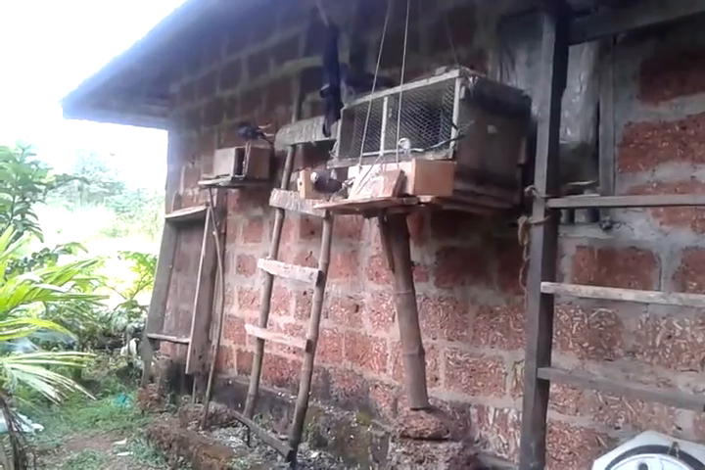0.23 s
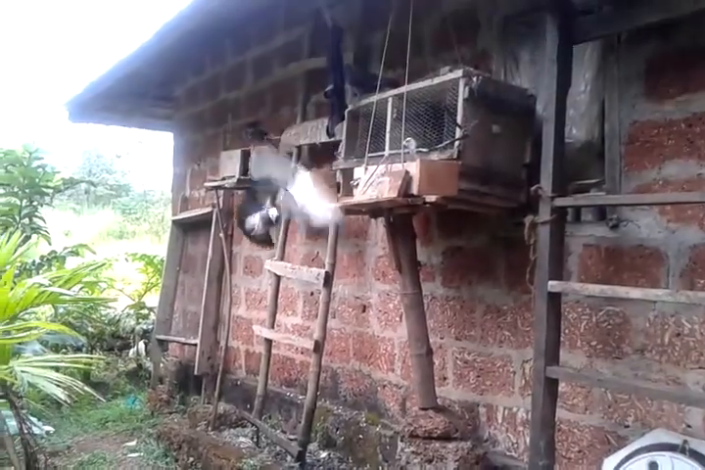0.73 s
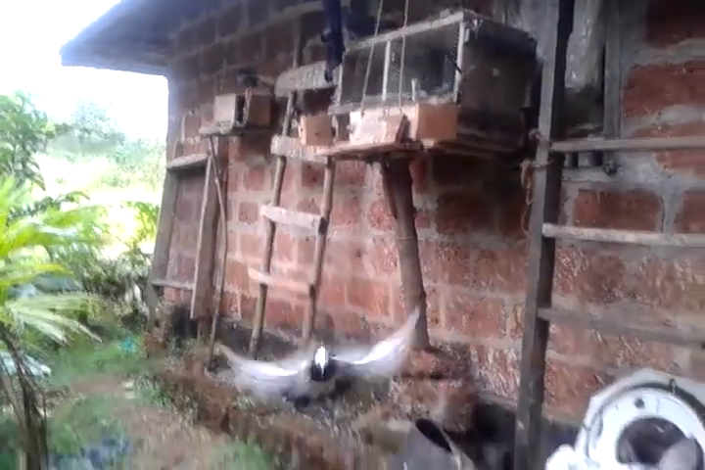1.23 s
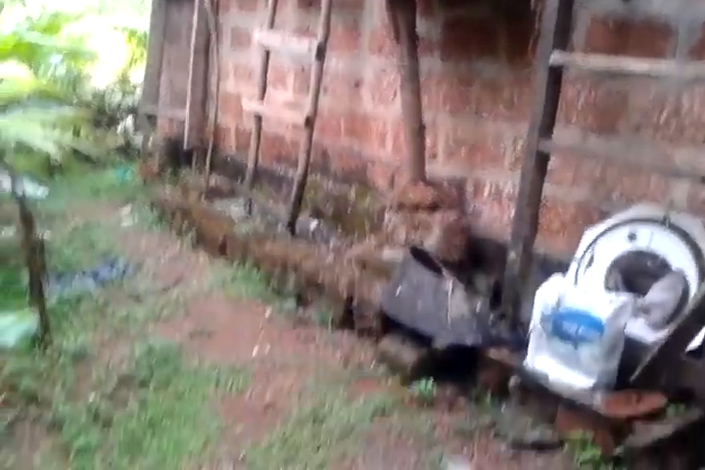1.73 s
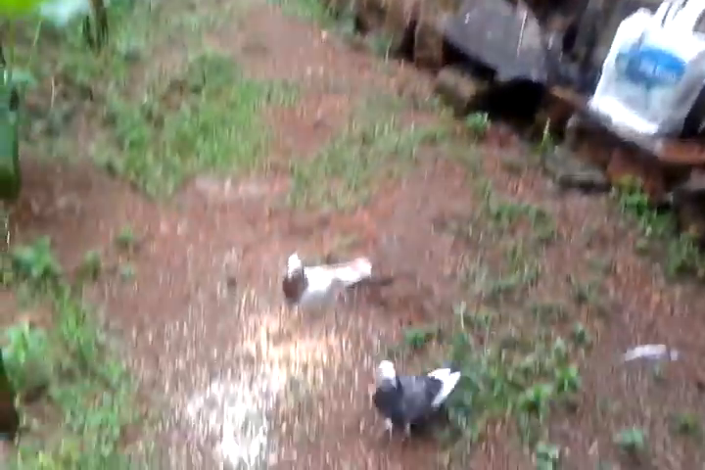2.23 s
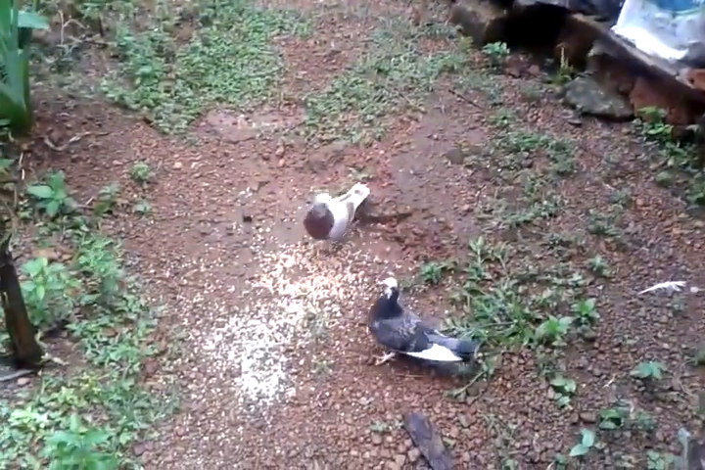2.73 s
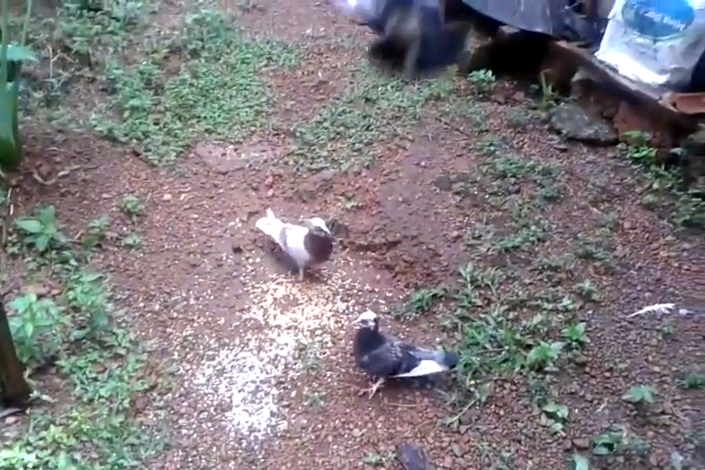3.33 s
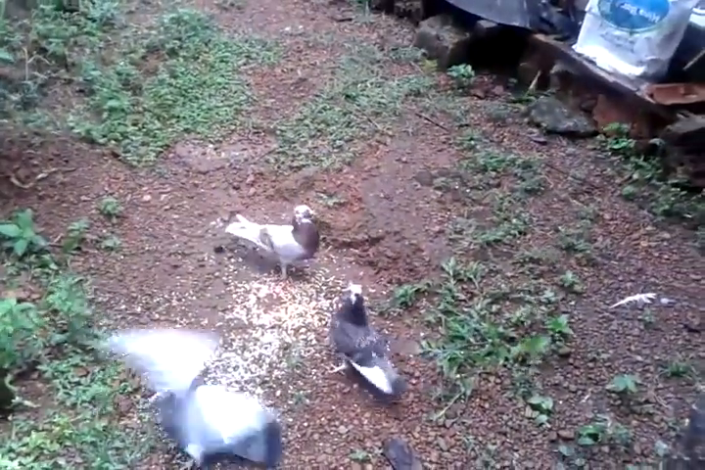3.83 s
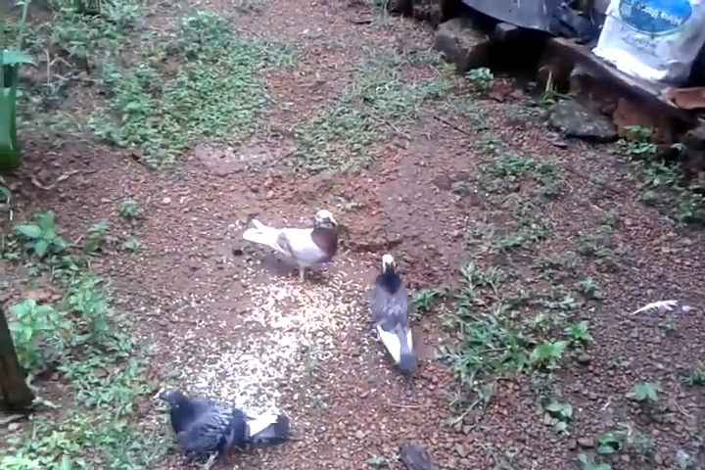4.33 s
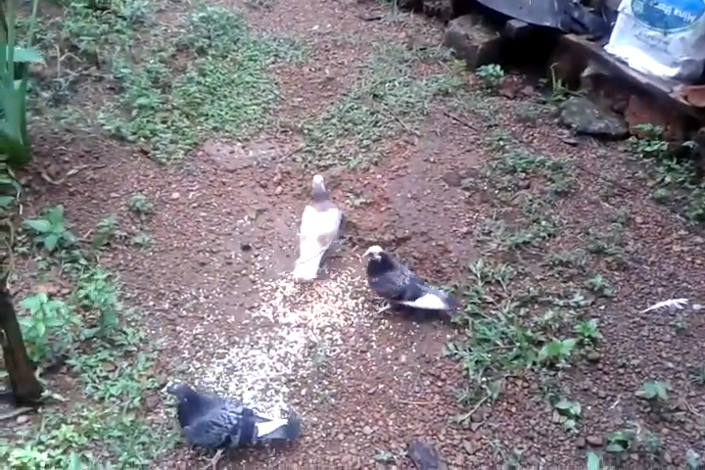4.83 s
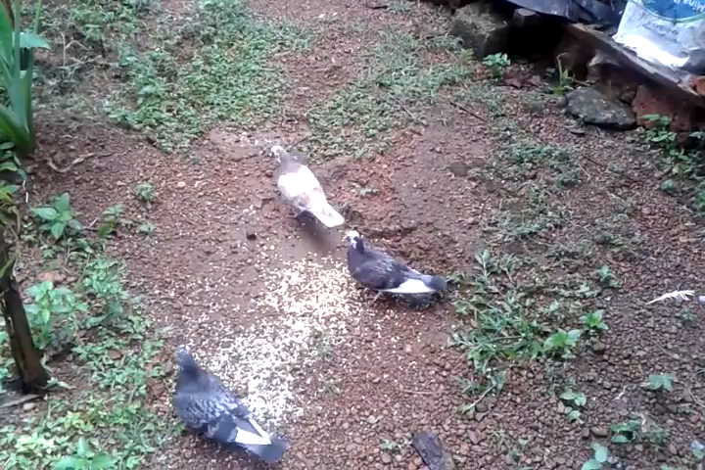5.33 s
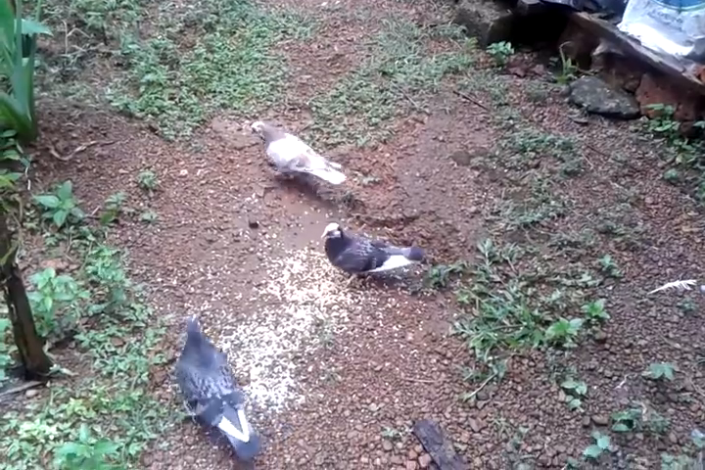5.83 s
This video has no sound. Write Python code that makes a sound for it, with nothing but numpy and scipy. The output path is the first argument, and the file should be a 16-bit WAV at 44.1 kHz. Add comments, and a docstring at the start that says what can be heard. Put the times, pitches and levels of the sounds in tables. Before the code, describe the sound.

A backyard pigeon loft by a wall, heard fairly close with short reflections and faint garden air. From 0 s feathers and feet rustle, with two brief claw scrapes and small wing claps; the rustle swells around 0.7 s. Thin, shaky squeals near 4-5 kHz start at 0.9 s and grow strong to 2.2 s, with crisp claps and, from 1.5 to 1.9 s, soft low wing thumps. A short scuffle at 2.1 s leads to a low, rolling coo at 2.2-2.5 s. From 2.55 to 3.7 s a fast flurry of wingbeats flaps and whooshes, ending in a dry snap and tiny faint peeps. Weak insect chirps recur about every half second from 2.75 s. Squealing resumes at 4.2-5.1 s, with a hollow knock and rustle at 4.7 s and a snap at 4.9 s. The background sinks into a hush, then a last wavering squeal runs from 5.6 s to the end.

```python
"""A backyard pigeon loft: young birds squeal with two throat membranes that whistle as a beating pair.
Wings thump as swelling low cycles and clap as spikes with noise tails; knocks are short rings.
Feathers, feet and claws are shaped noise; one bird coos as a pulsed hum with breath.
An insect chirps in sagging, pulsing tones over steady garden air, and walls add dying noise tails.
A noise suppressor turns everything down in the quiet gaps."""
import sys
import numpy as np
from scipy import signal
from scipy.fft import rfft, irfft, next_fast_len
from scipy.io import wavfile
from scipy.ndimage import uniform_filter1d, minimum_filter1d, map_coordinates

SR = 44100
rng = np.random.default_rng(int(sys.argv[2]) if len(sys.argv) > 2 else 0)


def dump_mix(stems):
    """Bounce the given channels to the path in sys.argv[1] as a 16-bit WAV at rate SR."""
    frames = np.atleast_2d(stems).T  # one column per channel
    limited = np.clip(frames, -1, 1)  # hard clip at full scale
    pcm = np.round(limited * 32767).astype(np.int16)
    wavfile.write(sys.argv[1], SR, pcm)


N = 268877


def amp(db):
    """Amplitude ratio of a level: 20 dB is a factor of ten."""
    return 10 ** (np.asarray(db) / 20)


def unit(x):
    """Normalisation to an rms of 1."""
    return x / np.sqrt(np.mean(x ** 2) + 1e-20)


def curves(rows):
    """Piecewise-linear contours: one curve for each column after the time, and a gate open while they last."""
    s, *columns = np.transpose(rows)
    t = np.arange(N) / SR
    gate = np.interp(t, [s[0] - .005, s[0], s[-1], s[-1] + .0065], [0, 1, 1, 0])
    return [np.interp(t, s, column) for column in columns] + [gate]


def window(start_s, long_s, ramp_s):
    """Trapezoidal envelope: linear ramps inside both ends of a stretch."""
    t = np.arange(N) / SR
    return np.clip(np.minimum(t - start_s, start_s + long_s - t) / ramp_s, 0, 1)


def wobble(rate):
    """Band-limited random modulation: a smooth curve through random knots, rate of them a second."""
    knots = rng.standard_normal(int(N * rate / SR) + 4)
    return map_coordinates(knots, [np.arange(N) * rate / SR])


def filtered(x, response):
    """Linear filtering: the spectrum times a complex response of frequency."""
    m = next_fast_len(N + SR // 2)
    return irfft(rfft(x, m) * response(np.fft.rfftfreq(m, 1 / SR)), m)[..., :N]


def coloured(x, points):
    """Spectral shaping through (Hz, dB) points on a log-frequency axis, normalised to rms 1."""
    f, db = np.transpose(points)
    return unit(filtered(x, lambda hz: amp(np.interp(np.log(hz + 1), np.log(f), db))))


def ring(hz, width_hz):
    """Damped resonance: a causal second-order band-pass of peak gain 1."""
    return lambda f: 1j * f * width_hz / (hz * hz - f * f + 1j * f * width_hz)


def grainy(per_s, cycles, low_hz, high_hz, share):
    """Shot noise over steady noise: sparse ticks, each a few damped cycles of its own pitch and size."""
    count = round(per_s * N / SR)
    when, pitch, size = rng.random((count, 3)).T[:, :, None]
    t = np.arange(256) / SR
    hz = low_hz * (high_hz / low_hz) ** pitch
    life = t * hz / cycles
    ticks = life * np.exp(-life) * np.sin(2 * np.pi * hz * t)
    ticks /= np.sqrt(size + .04)  # a few ticks are much larger than the rest
    spots = (when * N).astype(int) + np.arange(len(t))
    train = np.bincount(spots.ravel(), ticks.ravel(), N)[:N]
    return rng.standard_normal(N) + share * unit(train)


def garden():
    """Stationary background: broadband air, and a low hum and far insects as noise in narrow resonances."""
    # Garden air spectrum. Each row: frequency in Hz, relative level in dB.
    air_spectrum = [(25, -18.5), (102, -2), (190, -8), (3160, -18), (5800, -11.5), (16000, -24.5)]
    air = coloured(rng.standard_normal(N), air_spectrum)
    hum = unit(filtered(rng.standard_normal(N), lambda f: ring(108, 30)(f) ** 2))
    hum *= amp(-66.5 + 1.7 * wobble(3.4))
    insects = lambda f: ring(4710, 90)(f) ** 2 + .45 * ring(9500, 300)(f) ** 2
    chorus = unit(filtered(rng.standard_normal(N), insects)) * amp(5 * wobble(12))
    return amp(-56.0) * air + hum + amp(-62.0) * chorus


def insect():
    """Stridulation by wing strokes at a quarter of the pitch: clear at first, then sagging, pulsing and fading."""
    # Each row: start in seconds, initial pitch in Hz, main-tone level before the fade and flicker in dB.
    chirps = [(2.757, 9740, -53.5), (3.3, 9700, -52), (3.807, 9580, -45.5), (4.35, 9840, -50),
              (4.896, 9950, -51.5), (5.502, 10050, -51)]
    sag_hz_per_s = 1100
    partials = [(1, -12), (2, -7), (3, -12)]  # (multiple of the stroke rate, dB re the main tone)
    t = np.arange(SR // 2) / SR
    out = np.zeros(N + SR)
    for s, hz, db in chirps:
        pitch = hz - sag_hz_per_s * t + 30 * wobble(40)[:len(t)]
        phase = 2 * np.pi * np.cumsum(pitch) / SR
        pulses = np.sin(2 * np.pi * np.cumsum(270 + 50 * wobble(50)[:len(t)]) / SR)
        tone = np.sin(phase) * (1 + np.clip(t / .12, 0, 1) * pulses)
        tone += sum(amp(level_db) * np.sin(phase * k / 4) for k, level_db in partials)
        flicker_db = 3 * wobble(25)[:len(t)]
        fade = amp(db + flicker_db - 60 * t / .8) * (1 - np.exp(-t / .02))
        start = round(s * SR)
        out[start:start + len(t)] += fade * tone
    return out[:N]


def scrapes():
    """Friction noise of claws on the cage, exciting two resonances of its floor."""
    # Each row: start in seconds, length in seconds, level in dB.
    claw_strokes = [(0.163, 0.023, -46), (0.349, 0.057, -43)]
    envelope = sum(amp(db) * window(s, long, .0062) for s, long, db in claw_strokes)
    cage = lambda f: ring(1450, 450)(f) ** 2 - ring(2200, 350)(f) ** 2
    return envelope * unit(filtered(rng.standard_normal(N), cage))


def rustle():
    """Contact noise of feathers and feet: grainy hiss, duller body and stirred air, modulated in flurries."""
    # Feathers and feet while birds are busy. Each row: time in seconds, hiss level in dB.
    busy = [
        [(0, -46.5), (.7, -36.5), (.9, -38.5), (1.3, -43), (1.6, -45), (1.9, -40.5), (2.07, -57.5)],
        [(2.7, -66), (2.9, -49), (3.2, -51.5), (3.4, -48.5), (3.7, -45.5), (3.8, -47.5), (3.92, -68)],
    ]
    # Brief scuffles. Each row: start, peak and end in seconds, peak hiss in dB, body re the hiss in dB.
    brief = [(2.088, 2.11, 2.21, -39, -2.5), (4.583, 4.614, 5.03, -40.5, -8.5),
             (4.665, 4.715, 4.813, -36, -6.5)]
    # Spectra of hiss, body and air stirred by the birds. Each row: frequency in Hz, relative level in dB.
    hiss_spectrum = [(1760, -20), (3000, -15.5), (3240, -16), (4600, -9.5), (5850, -4), (7000, -12),
                     (16000, -41.5)]
    body_spectrum = [(120, -25), (400, -6), (900, -4), (3300, 0.5), (4500, -19.5)]
    draught_spectrum = [(30, -20), (90, -11), (250, -6.5), (500, -14)]
    busy_body_db, draught_db = -14, -14  # both re the hiss
    edge_db = -20  # ends of a scuffle re its peak

    flurry = wobble(12)
    grains = grainy(per_s=1200, cycles=2.2, low_hz=3500, high_hz=11000, share=.7)
    hiss = amp(1.3 * flurry + 2.5 * wobble(60)) * coloured(grains, hiss_spectrum)
    body = amp(2 * flurry + 2 * wobble(30)) * coloured(rng.standard_normal(N), body_spectrum)
    draught = amp(draught_db) * coloured(rng.standard_normal(N), draught_spectrum)
    stretches = [(rows, busy_body_db) for rows in busy]
    for start, peak, end, db, body_db in brief:
        swell = [(start, db + edge_db), (peak, db), (end, db + edge_db)]
        stretches.append((swell, body_db))
    out = np.zeros(N)
    for rows, body_db in stretches:
        db, gate = curves(rows)
        out += gate * amp(db) * (hiss + amp(body_db) * body + draught)
    return out


def coo():
    """Amplitude modulation in the throat: a pulsing hum and pulses of breath through the swollen crop."""
    # Each row: time in seconds, mean pitch in Hz, level before the roll and mix in dB.
    contour = [(2.17, 238.5, -52), (2.238, 259.4, -55), (2.255, 324.7, -44), (2.435, 268.8, -43),
               (2.5, 223, -57)]
    hz, db, gate = curves(contour)
    phase = 2 * np.pi * np.cumsum(hz + 12 * wobble(40)) / SR
    roll_phase = 2 * np.pi * np.cumsum(55 + 12 * wobble(45)) / SR  # an uneven 55 Hz
    roll = (1 + np.sin(roll_phase) / 2) ** 2
    hum = roll * np.sin(phase)
    breath = unit(filtered(roll * rng.standard_normal(N), lambda f: ring(305, 130)(f) ** 2))
    return gate * amp(db) * (.75 * hum + .4 * breath)


def knocks():
    """Damped oscillation: each knock is one short ring of slightly unsteady phase."""
    # Each row: start in seconds, level before the onset and decay in dB.
    hits = [(4.613, -35.5), (4.697, -21)]
    hz, rise_s, t60_s = 878, .0026, .046
    t = np.arange(SR // 8) / SR
    out = np.zeros(N + SR)
    for s, db in hits:
        envelope = amp(db - 60 * t / t60_s) * (1 - np.exp(-t / rise_s))
        phase = 2 * np.pi * hz * t + .99 * wobble(230)[:len(t)]
        start = round(s * SR)
        out[start:start + len(t)] += envelope * np.sin(phase)
    return out[:N]


def strikes(table, spike, t60):
    """Impulse and decaying noise with smaller spikes as feathers meet, through bright and body resonances."""
    t = np.arange(SR // 4) / SR
    bright, body = np.zeros(N + SR), np.zeros(N + SR)
    for s, db, body_db in table:
        envelope = .22 * amp(-60 * t / t60) * (1 - np.exp(-t / .00049))
        puff = envelope * rng.standard_normal((2, len(t)))
        puff *= 1 + 3 * (rng.random(len(t)) < .012)  # smaller spikes
        puff[:, :3] = spike  # first three samples
        start = round(s * SR)
        bright[start:start + len(t)] += amp(db + 11.0) * puff[0]
        body[start:start + len(t)] += amp(db + body_db + 17.5) * puff[1]
    edge = lambda f: ring(5600, 2600)(f) * ring(5900, 5000)(f) * ring(6000, 7000)(f)
    chest = lambda f: ring(2400, 4000)(f) * ring(900, 3500)(f)
    return filtered(bright[:N], edge) + filtered(body[:N], chest)


def claps():
    """Impact sound: wings meeting give a puff with a tail; snaps of a quill or claw are nearly all spike."""
    # Wing tips clapping. Each row: start in seconds, relative strength in dB, relative body share in dB.
    wing_claps = [(0.13, -20, -22), (0.2533, -25.5, -35.5), (0.3292, -28, -11), (0.5043, -22.5, -14.5),
                  (1.1343, -16, -16.5), (1.279, -24, -15), (1.4099, -11.5, -12.5), (1.4785, -26.5, -11),
                  (1.5398, -14, -18), (1.5863, -19, -35.5), (1.6529, -12, -16), (1.891, -13.5, -15),
                  (2.1537, -20, -19.5), (2.3148, -31, -12), (2.5433, -36.5, -2), (2.7495, -21.5, -14.5),
                  (2.7866, -26.5, -8), (2.8603, -15.5, -8.5), (2.9492, -25.5, -22), (2.966, -29, -3),
                  (3.092, -38, -5), (3.218, -36, -1), (3.3348, -23.5, -9), (3.475, -34, -0.5),
                  (3.5907, -23, -6.5), (4.685, -24, -6.5)]
    # Dry snaps of a quill or claw. Each row: start in seconds, relative strength and body share in dB.
    dry_snaps = [(0.7285, -23, -20), (0.8296, -15, -35), (1.7685, -8, -19.5), (3.7034, -10.5, -20.5),
                 (3.881, -35, -20), (4.8895, -18.5, -21), (5.1905, -36.5, -34), (5.2425, -31.5, -26),
                 (5.8415, -52, 7)]
    return strikes(wing_claps, spike=.25, t60=.07) + strikes(dry_snaps, spike=1.6, t60=.04)


def thumps():
    """Air displacement by wing strokes: a few uneven low cycles under a swell, with a puff of feather noise."""
    # Each row: time of the swell's peak in seconds, peak level of the low cycles in dB.
    wing_strokes = [(1.527, -38.5), (1.573, -40.5), (1.65, -37.5), (1.698, -39.5), (1.768, -33),
                    (1.886, -36), (2.551, -41), (2.676, -37.5), (2.737, -39), (2.792, -35.5),
                    (2.848, -39.5), (2.894, -33), (2.949, -38), (3.02, -38), (3.065, -41), (3.133, -38.5),
                    (3.225, -41.5), (3.275, -40), (3.328, -36), (3.461, -34.5), (3.519, -38), (3.583, -33),
                    (3.661, -38), (3.698, -36.5)]
    centre_hz, mean_rise_s = 302.4, .01
    whoosh = [(60, -22), (300, 14.5), (900, 8.5), (5500, -3.5), (15000, -76)]  # (Hz, relative dB)
    t = np.arange(SR // 8) / SR
    low, puff = np.zeros(N + SR), np.zeros(N + SR)
    for s, db in wing_strokes:
        hz = centre_hz * (1 + .14 * rng.uniform(-1, 1))
        rise_s = mean_rise_s * rng.uniform(.8, 1.4)
        swell = (t / rise_s * np.exp(1 - t / rise_s)) ** 2
        drift = .095 * np.cumsum(rng.standard_normal(len(t)))  # radians
        start = round((s - rise_s) * SR)
        low[start:start + len(t)] += amp(db) * swell * np.sin(2 * np.pi * hz * t + drift)
        puff[start:start + len(t)] += amp(db) * swell ** .21  # flatter and longer
    return low[:N] + amp(-12.5) * puff[:N] * coloured(rng.standard_normal(N), whoosh)


def squeals():
    """Two coupled whistles: membranes a little apart beat, tremble, and bend into weak overtones."""
    # Long squeals, one curve each. Each row: time in seconds, lower voice in Hz before tremble, level in dB.
    long_calls = [
        [(.915, 5400, -40), (.945, 4600, -29.5), (.96, 4250, -39), (.98, 4600, -33)],
        [(.985, 5300, -40), (1.005, 6200, -47), (1.03, 5800, -45), (1.052, 6100, -38), (1.075, 5600, -38.5)],
        [(1.066, 4460, -40.5), (1.086, 4730, -30), (1.1, 4325, -30), (1.125, 4205, -28), (1.15, 4520, -40),
         (1.185, 4680, -28.5), (1.198, 5050, -25), (1.22, 4710, -29), (1.24, 4310, -33.5), (1.266, 4290, -26.5),
         (1.28, 4650, -27), (1.3, 4440, -40), (1.33, 4530, -28), (1.347, 4810, -22.5), (1.369, 4000, -39)],
        [(1.582, 4490, -27.5), (1.605, 5070, -21.5), (1.644, 3990, -38), (1.698, 4800, -35.5),
         (1.714, 4580, -22.5), (1.745, 4630, -36.5), (1.762, 4170, -23.5), (1.79, 4480, -35.5),
         (1.836, 5130, -27.5), (1.862, 4150, -26), (1.868, 4710, -24.5), (1.904, 4880, -20), (1.921, 4170, -32),
         (1.975, 4700, -35.5)],
        [(2.005, 5270, -22.5), (2.031, 4740, -20.5), (2.085, 4803, -20), (2.11, 4660, -36), (2.135, 4776, -25),
         (2.167, 4290, -35.5), (2.187, 4150, -27.5), (2.205, 3660, -44)],
        [(4.168, 4000, -36.5), (4.18, 4930, -33), (4.192, 5070, -27), (4.208, 4400, -46), (4.255, 4000, -47)],
        [(4.262, 4350, -40), (4.285, 4800, -30), (4.338, 4520, -40), (4.362, 4845, -30.5), (4.42, 4700, -44),
         (4.43, 4430, -33), (4.532, 4350, -31), (4.545, 4650, -35), (4.585, 4670, -33.5), (4.6, 4350, -26.5),
         (4.65, 4480, -23.5), (4.71, 4186, -30.5), (4.759, 4404, -29), (4.805, 4640, -41), (4.815, 4460, -21),
         (4.86, 4420, -24.5), (4.915, 4230, -25.5), (4.94, 4490, -24), (5.051, 4580, -25.5), (5.08, 3964, -38)],
        [(5.578, 3800, -43.5), (5.609, 4740, -29.5), (5.63, 4960, -48), (5.655, 4436, -33), (5.74, 4460, -34.5),
         (5.77, 5020, -41.5), (5.845, 4415, -30.5), (5.915, 4780, -31), (5.97, 4565, -28), (6.045, 4600, -26),
         (6.065, 4380, -33.5), (6.096, 4660, -25)],
    ]
    # Short peeps. Each row: start and length in seconds, first and last pitch in Hz, mid-call level in dB.
    short_calls = [(3.521, 0.013, 4430, 4120, -37.5), (3.626, 0.024, 4460, 4758, -39.5),
                   (3.669, 0.014, 4315, 4884, -38.5), (3.824, 0.059, 4830, 4710, -45.5),
                   (4.03, 0.033967, 4000, 4276, -49.5), (4.077, 0.045, 4360, 4200, -47.5),
                   (3.751, 0.01, 4260, 4420, -40)]
    # The upper membrane joins in. Each row: start and length in seconds, level added re the lower in dB.
    duets = [(1.092, 0.0541, -3.5), (1.231, 0.116, -2), (2.011, 0.02716, -2), (2.124, 0.0883, -4.5),
             (4.667, 0.1, 1), (4.863, 0.098, -10), (5.589, 0.216, 0.5), (5.795, 0.084, -3),
             (5.937, 0.21, -10)]
    # Air past the membranes. Each row: frequency in Hz, relative level in dB.
    wheeze_spectrum = [(2500, -22.5), (4000, -7), (5800, 3.5), (9000, -34.5)]
    wheeze_db = -26  # mean, re the voice
    solo_db, join_s = -24, .006  # upper voice outside the duets once calm; time it takes to join
    firm_db, hoarse_hz_per_db = -33, 6  # below this level the pitch shakes more and more

    unrest = np.where(np.arange(N) < 2 * SR, 1.8, 1)  # the chicks jostle while the adults take off
    tremble = unrest * 36 * wobble(150)  # Hz, shared by both membranes
    low_own = 15 * wobble(260)  # Hz
    apart_hz = 260 + (unrest - 1) * 200 + unrest ** 2 * 30 * wobble(60)
    low_flicker = amp(unrest * 1.7 * wobble(110))
    high_flicker = amp(unrest * 2 * wobble(90))
    rasp = amp(unrest * 1.3 * wobble(320))  # the tone breaks up more as the chicks jostle
    wheeze = amp(wheeze_db + 4.5 * wobble(60)) * coloured(rng.standard_normal(N), wheeze_spectrum)
    shaky_hz = hoarse_hz_per_db * wobble(700)
    patchy = amp(5 * wobble(45))  # the overtones come and go
    upper = amp(solo_db) * unrest ** 2
    upper = upper + sum(amp(db) * window(s, long, join_s) for s, long, db in duets)

    calls = list(long_calls)
    for s, long, first, last, db in short_calls:
        middle = (s + long / 2, (first + last) / 2, db)
        calls.append([(s, first, db - 6.5), middle, (s + long, last, db + 4)])
    out = np.zeros(N)
    for rows in calls:
        hz, db, gate = curves(rows)
        hz = hz + np.clip(firm_db - db, 0, 20) * shaky_hz  # faint calls are hoarse
        low = 2 * np.pi * np.cumsum(hz + tremble + low_own) / SR
        high = 2 * np.pi * np.cumsum(hz + apart_hz + tremble) / SR
        pair = low_flicker * np.exp(1j * low) + upper * high_flicker * np.exp(1j * high)
        tone = amp(db) * pair
        turn = tone / (np.abs(tone) + 1e-9)  # phase alone; each factor raises the harmonic by one
        overtones = amp(-28.0) * tone * turn + amp(-43.0) * tone * turn * turn
        out += gate * np.imag(tone * rasp + overtones * patchy)
        out += gate * amp(db) * wheeze
    return out


def wall(x, t60):
    """Reverberation: walls and eaves answer after 6 ms with exponentially decaying noise of unit energy."""
    t = np.arange(SR // 3) / SR
    tail = amp(-60 * t / t60) * rng.standard_normal(len(t)) * (t > .006)
    return signal.fftconvolve(x, tail / np.linalg.norm(tail))[:N]


def scene():
    """Superposition: near birds, their wall reflections and the background add linearly in one channel."""
    voices = squeals()
    near = voices + claps() + thumps() + knocks() + coo()
    yard = amp(-11.5) * wall(near, t60=.14) + amp(-12.5) * wall(voices, t60=.2)
    return (near + yard + scrapes() + rustle() + insect() + garden())[None]


def record(dry):
    """Downward expansion: gain opens fast for loud sound and closes slowly in the quiet; then a band limit."""
    floor_db, range_db, depth_db = -53.5, 12, 15.4  # shut at the floor, fully open 12 dB above it
    release_s, top_hz = .07, 15900
    level_db = 10 * np.log10(np.abs(uniform_filter1d(dry ** 2, size=600)) + 1e-12)
    wanted = np.clip((level_db - floor_db) / range_db, 0, 1)
    held = -minimum_filter1d(-wanted, size=1201, origin=400)  # a moving maximum, mostly of the past
    keep = np.exp(-1 / (release_s * SR))
    closing = signal.lfilter([1 - keep], [1, -keep], held, zi=[[keep]])[0]
    opening = uniform_filter1d(np.maximum(held, closing), size=400)
    quieted = dry * amp(depth_db * (opening - 1))
    return filtered(quieted, lambda hz: hz < top_hz)


dry = scene()
out = record(dry)
dump_mix(out)
```